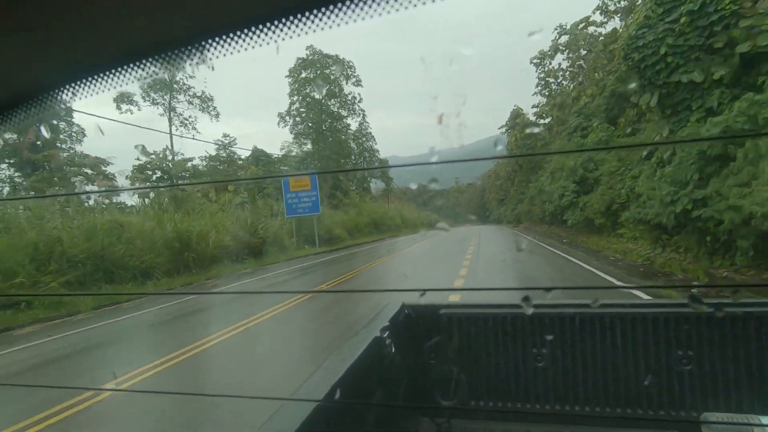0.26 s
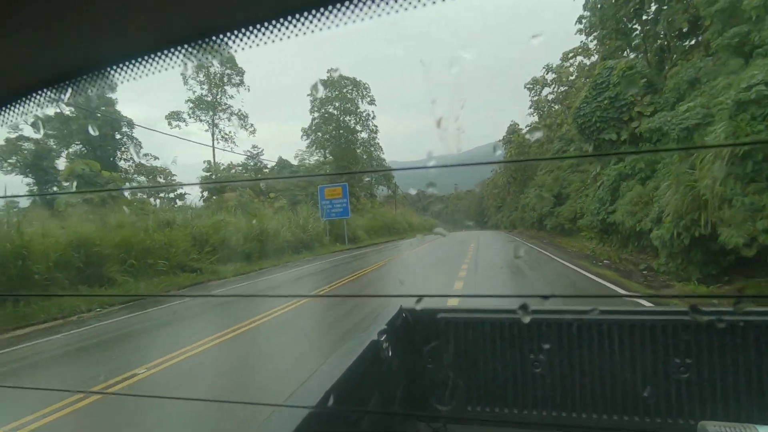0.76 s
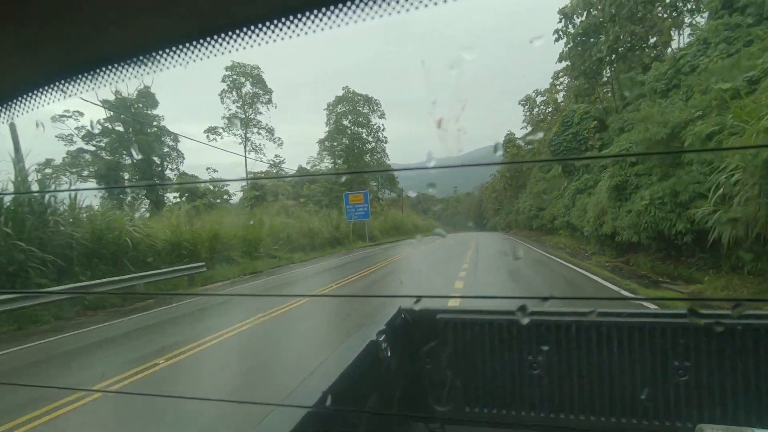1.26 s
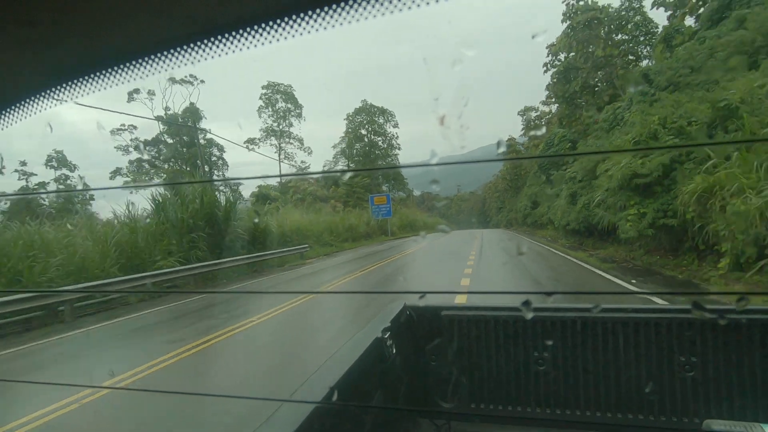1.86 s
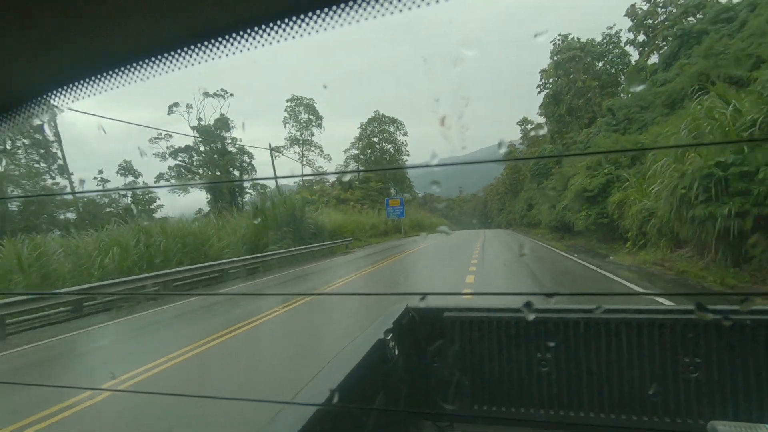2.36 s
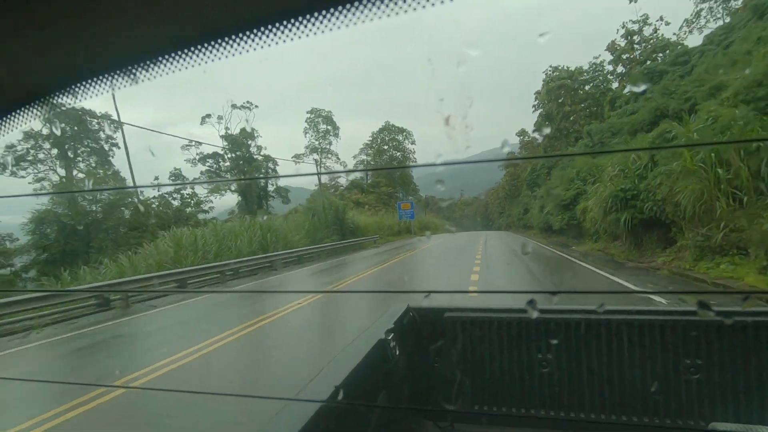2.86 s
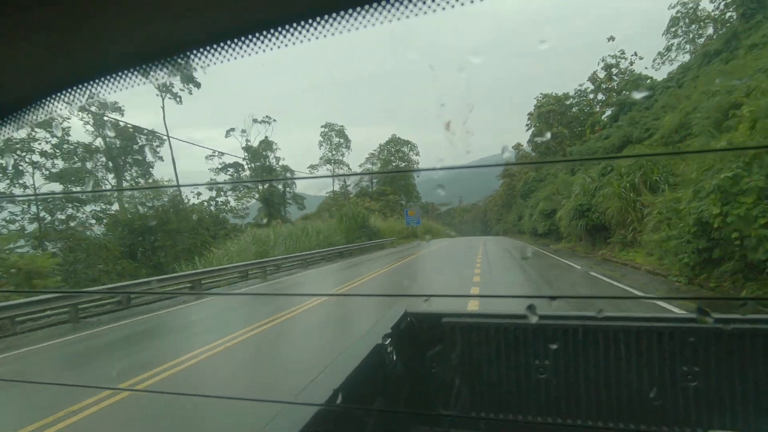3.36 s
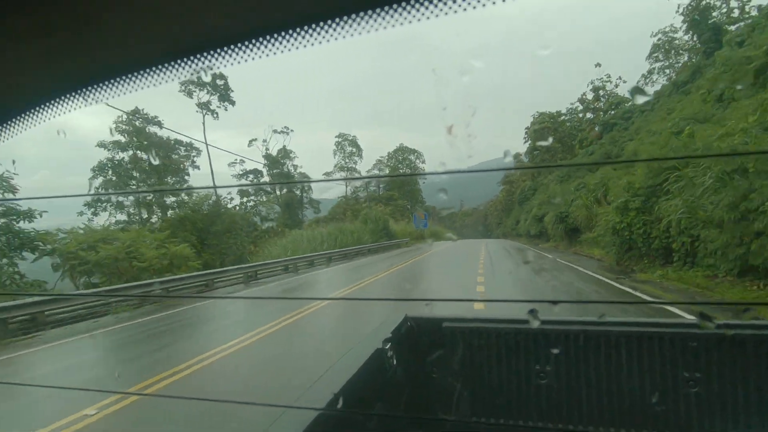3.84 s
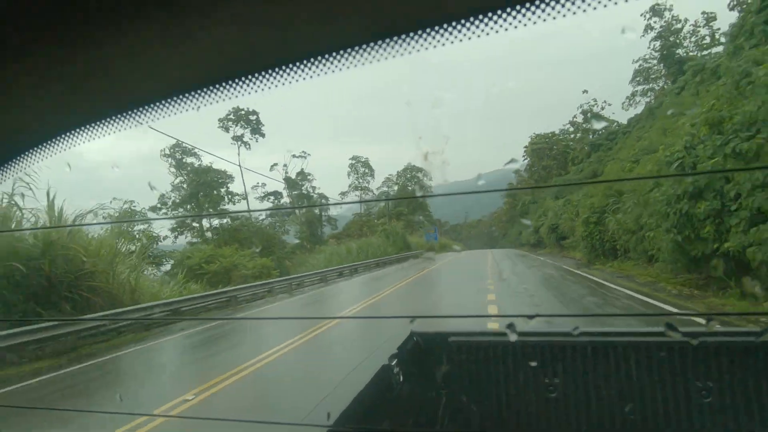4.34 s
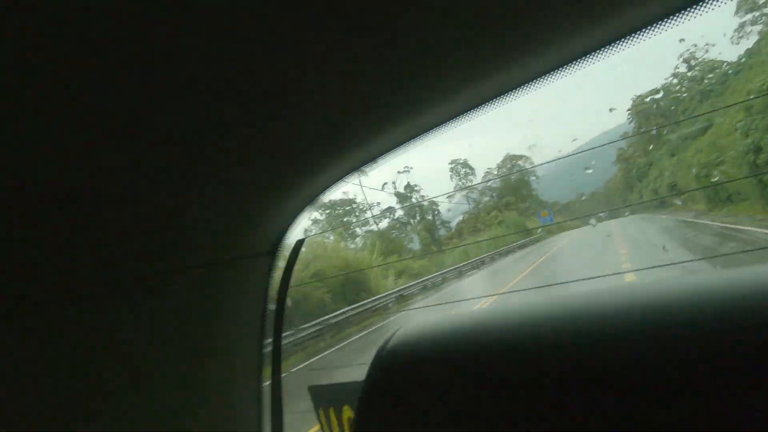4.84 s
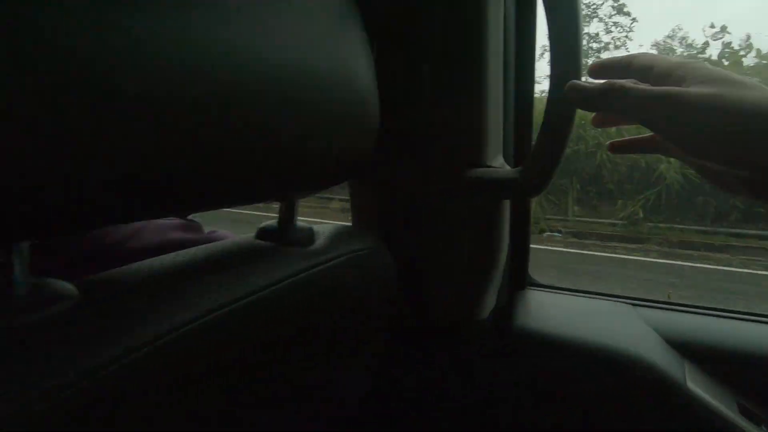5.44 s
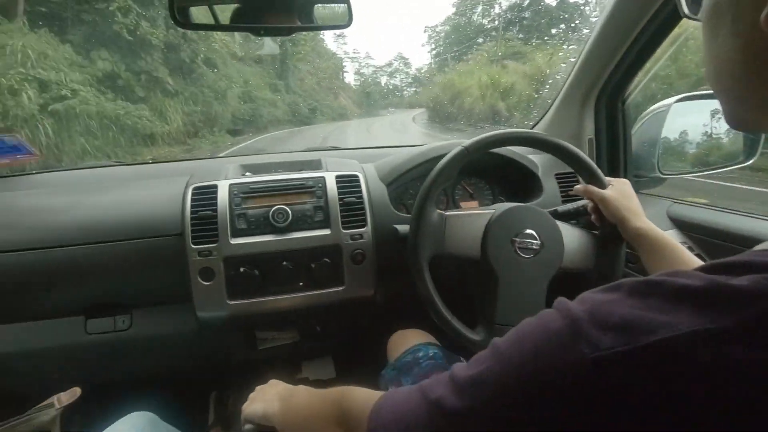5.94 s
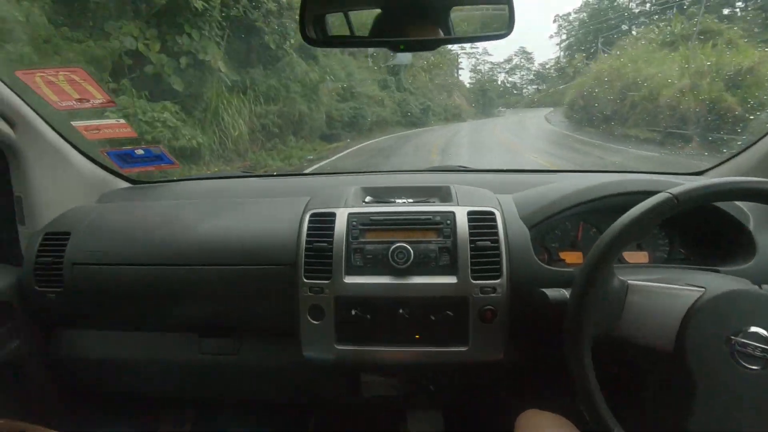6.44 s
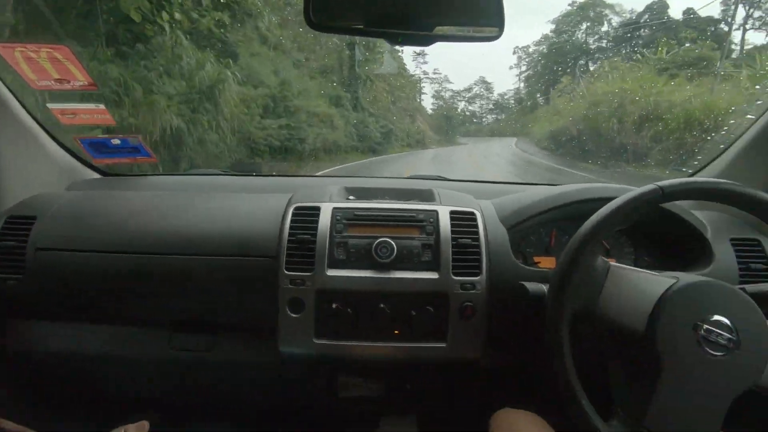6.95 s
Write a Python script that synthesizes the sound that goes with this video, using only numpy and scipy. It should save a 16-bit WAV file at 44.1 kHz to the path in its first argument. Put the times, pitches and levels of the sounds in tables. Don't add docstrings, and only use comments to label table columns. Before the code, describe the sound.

Steady low diesel drone and wet-road tyre roar inside a pickup cab, with body rumble, tiny ticks and a few dull handling knocks.

```python
import sys
import numpy as np
from scipy import signal
from scipy.io import wavfile
from scipy.ndimage import uniform_filter1d, minimum_filter1d

SR = 44100
rng = np.random.default_rng(int(sys.argv[2]) if len(sys.argv) > 2 else 0)


def volts(x):
    e = np.asarray(x, float) / 20
    return 10 ** e


def bounce(signal):
    frames = np.transpose(np.atleast_2d(signal))
    limited = np.clip(frames, -1, 1)
    pcm = np.round(limited * 32767).astype(np.int16)
    wavfile.write(sys.argv[1], SR, pcm)


N = 317520


def rms_one(x):
    return x / np.sqrt(np.mean(x ** 2) + 1e-20)


def in_time(rows):
    t, *columns = np.transpose(rows)
    return [np.interp(np.arange(N) / SR, t, column) for column in columns]


def at_hz(points, hz, axis=1):
    points = np.array(points)
    return np.interp(np.log(hz), np.log(points[:, 0]), points[:, axis])


def drift(rate_hz):
    thin = 40
    settle = 4000
    pole = np.exp(-2 * np.pi * rate_hz * thin / SR)
    white = rng.standard_normal(N // thin + settle + 2)
    slow = signal.lfilter([1], [1, -2 * pole, pole * pole], white)[settle:]
    return np.interp(np.arange(N) / thin, np.arange(len(slow)), rms_one(slow - slow.mean()))


def add(track, t, shape):
    i = round(t * SR)
    track[..., i:i + shape.shape[-1]] += shape[..., :N - i]


# f/Hz, lean to the right [0-1], left lead [share of mid], unrelated part level/dB re mid
PORTS = [(30, .28, 0.01, -9), (100, 0.16, 0.01, -12), (200, 0.12, 0.01, -23.5), (500, 0.39, .05, -10),
         (900, 0, .8, 2.5), (1500, 0, .7, -6), (2800, 0.08, .4, -1.5), (4800, .15, .05, -5.5),
         (8000, 0, 0.0091, 2)]


def through_ports(mid, stray, hz):
    quarter_ahead = np.gradient(mid) * SR / (2 * np.pi * hz)
    lean = at_hz(PORTS, hz)
    lead = at_hz(PORTS, hz, axis=2)
    unrelated = volts(at_hz(PORTS, hz, axis=3))
    side = -lean * mid + lead * quarter_ahead + unrelated * stray
    return np.array([mid, side])


# f/Hz, level/dB per Hz
SHUDDER = [(10, -12), (18, -3.5), (32, -2), (45, -9), (70, -25)]
RUMBLE = [(25, -21.5), (48, 0.5), (66, -0.5), (85, -9.5), (110, -23.5)]
PANELS = [(70, -7.5), (110, -3.5), (160, 1), (220, -4.5), (300, -13.5), (420, -33)]
ROAR = [(280, -9.5), (340, -2.5), (480, -12), (630, -13), (1070, -23.5), (1500, -26), (1900, -29.5),
        (2300, -39.5), (2800, -55)]
SIZZLE = [(1500, -10), (2200, -2.5), (2800, -3), (3600, -6.5), (4400, -14)]
SPRAY = [(3300, -17.5), (4300, -2.5), (5400, 1.5), (6500, -2.5), (7600, -6.5), (9000, -27.5), (10500, -35),
         (13000, -26.5), (16000, -31.5)]
MIST = [(6000, -11), (7600, 2), (8800, -12), (10000, -22.5), (12000, -34.5)]


def band_shares(edges, centres):
    shares = []
    for spectrum in [SHUDDER, RUMBLE, PANELS, ROAR, SIZZLE, SPRAY, MIST]:
        inside = (centres > spectrum[0][0]) & (centres < spectrum[-1][0])
        power = volts(at_hz(spectrum, centres)) ** 2 * np.diff(edges) * inside
        shares.append(power / power.sum())
    return np.array(shares)


# t/s, shudder level/dB, rumble level/dB
BODY = [(0.0, -57, -72), (0.06, -21, -40.5), (0.18, -48, -28), (0.3, -36.5, -18.5), (0.36, -33, -28.5),
        (0.5, -48, -18.5), (0.98, -38, -21), (1.26, -26.5, -25.5), (1.3, -34, -19), (1.44, -40, -23.5),
        (1.5, -10, -23), (1.62, -24.5, -22.5), (1.92, -35.5, -18.5), (2.04, -16, -27), (2.21, -56, -19.5),
        (2.28, -23, -19.5), (2.32, -38.5, -27.5), (2.36, -20, -24), (2.45, -25, -22), (2.49, -27.5, -15.5),
        (2.55, -31, -21), (2.89, -53.5, -19.5), (2.97, -23, -19), (3.01, -33.5, -18), (3.29, -31, -29.5),
        (3.33, -28.5, -37), (3.51, -37.5, -25), (3.55, -17.5, -35.5), (3.67, -57, -25.5), (3.71, -43, -28),
        (3.79, -33, -42), (3.85, -46, -22), (3.91, -34, -22.5), (3.97, -33, -22), (4.07, -31, -33.5),
        (4.13, -24, -24), (4.41, -29.5, -15.5), (4.49, -35, -22), (4.59, -22, -17.5), (4.69, -21, -27.5),
        (4.73, -12.5, -18.5), (4.79, -46, -19.5), (4.83, -33, -18), (4.89, -22, -21.5), (4.93, -15, -25),
        (4.97, -26.5, -23), (5.09, -23, -17.5), (5.13, -26, -23.5), (5.43, -32, -23), (5.55, -38.5, -22),
        (5.59, -20, -19.5), (5.69, -25.5, -24.5), (5.75, -22, -25), (5.79, -23.5, -29), (5.9, -23.5, -26),
        (6.0, -31, -35.5), (6.06, -20, -18), (6.17, -25, -33), (6.22, -30, -26.5), (6.54, -26.5, -24.5),
        (6.6, -28.5, -27), (6.64, -26.5, -25.5), (6.74, -33.5, -25.5), (6.94, -23.5, -24.5),
        (6.98, -29, -35.5), (7.04, -42, -28), (7.1, -48, -31), (7.2, -52.5, -29)]
# t/s, roar level/dB, tread sizzle level/dB, spray level/dB, fine mist level/dB
TYRES = [(0.0, -45.5, -77, -60.5, -57.5), (0.02, -45.5, -76, -70.5, -96), (0.4, -44.5, -76.5, -67.5, -88.5),
         (0.44, -46, -73, -71.5, -90.5), (0.46, -44, -76, -66.5, -84), (0.56, -46, -74, -71, -85.5),
         (0.92, -46.5, -71.5, -70.5, -90.5), (0.96, -48, -73, -66, -72.5), (1.04, -46, -71.5, -72.5, -83),
         (1.32, -45.5, -66.5, -69.5, -82), (1.52, -45.5, -67.5, -72, -76.5), (1.72, -47, -67, -69, -78.5),
         (1.76, -45.5, -66.5, -71.5, -77), (2.28, -47, -68, -72, -76.5), (2.69, -46, -67, -70.5, -79),
         (2.83, -44, -65.5, -71.5, -72), (2.87, -55.5, -72.5, -77.5, -81), (3.03, -49, -72.5, -73, -81),
         (3.15, -52.5, -80.5, -77.5, -98.5), (3.27, -55, -78, -73, -96.5), (3.41, -50, -75, -69.5, -84),
         (3.47, -55.5, -76, -72, -96.5), (3.51, -43.5, -79, -76, -81.5), (3.53, -58, -76, -72.5, -92),
         (3.59, -50, -77, -69, -84), (3.63, -51.5, -76, -70, -86.5), (3.73, -50.5, -75, -70, -93.5),
         (3.87, -50.5, -76, -71, -86.5), (3.99, -48, -74, -70.5, -93.5), (4.17, -46, -73.5, -69.5, -80.5),
         (4.53, -48, -74.5, -68, -88.5), (4.71, -48.5, -76, -70, -84.5), (4.85, -51, -76, -70, -84),
         (5.07, -49.5, -76, -68, -86), (5.11, -51.5, -79, -64, -67), (5.17, -49.5, -75, -70, -86.5),
         (5.35, -49.5, -74, -67, -73.5), (5.37, -49, -75.5, -68, -75.5), (5.59, -48, -71.5, -66.5, -72),
         (5.65, -48, -74, -65.5, -78), (5.88, -48.5, -70, -66, -64.5), (5.94, -47, -77, -64.5, -81),
         (6.0, -47.5, -70, -65.5, -82), (6.19, -47, -68, -64, -70), (6.22, -46.5, -71, -65, -76.5),
         (6.34, -48, -67, -67, -75), (6.38, -45, -65, -63, -76), (6.44, -45.5, -66.5, -66, -82),
         (6.58, -46.5, -64, -66, -74.5), (6.84, -44.5, -62.5, -65, -69.5), (7.04, -47, -65.5, -68.5, -80.5),
         (7.16, -47.5, -71, -68, -84), (7.18, -46, -64, -62, -73), (7.2, -48, -71, -65.5, -71.5)]


def road(own_db, shared_db, panel_db, evenness):
    _, _, boom_db, growl_db = in_time(ENGINE)
    panels_db = (boom_db + growl_db) / 2 + panel_db
    powers = volts(np.array(in_time(BODY) + [panels_db] + in_time(TYRES))) ** 2
    edges = 12.5 * 2 ** (np.arange(32) / 3)
    centres = np.sqrt(edges[1:] * edges[:-1])
    shares = band_shares(edges, centres)
    white = rng.standard_normal((2, 2, N + SR // 2))
    splash = drift(42)
    out = 0
    for k, hz in enumerate(centres):
        band = signal.butter(3, edges[k:k + 2], "band", fs=SR, output="sos")
        pair = signal.sosfilt(band, white[k % 2])[:, -N:]
        if hz < 100:
            local_power = uniform_filter1d(pair ** 2, size=int(2 * SR / hz)) + 1e-12
            pair = pair / local_power ** (evenness / 2)
        wetness = np.clip(np.log2(hz / 700) / 10.0, 0, 1)
        flicker = volts(own_db * drift(8) + shared_db * wetness * splash)
        gain = np.sqrt(shares[:, k] @ powers) * flicker / pair.std()
        out = out + through_ports(*(gain * pair), hz)
    return out


def jolt(height, decay_s):
    return height * np.exp(-np.arange(N) / SR / decay_s)


# t/s, peak level/dB, f/Hz
TICKS = [(0.304, -49.5, 4530), (0.4597, -44, 5160), (1.6872, -44.5, 3990), (1.717, -43.5, 3980),
         (2.0684, -51.5, 7280), (2.4536, -51.5, 3970), (2.7268, -49.5, 4240), (2.8934, -55, 4150),
         (2.9114, -51, 4070), (2.9622, -54, 4150), (3.3202, -58, 4412), (3.504, -46.5, 4470),
         (3.56, -61, 4302), (3.5858, -56.5, 4150), (3.685, -54.5, 4370), (3.7908, -55, 4950),
         (5.086, -53.5, 4000), (5.105, -45.5, 4050), (5.455, -56.5, 4380), (5.5683, -50.5, 6280),
         (5.6062, -43, 4350), (5.6484, -53.5, 4620), (5.6738, -51.5, 4850), (5.743, -48, 4210),
         (5.7918, -49.5, 5540), (6.2415, -44.5, 4700), (6.3126, -63.5, 5510), (6.364, -44, 5920),
         (6.4416, -49.5, 4760), (6.5576, -50, 4860), (6.5913, -51.5, 6150), (6.707, -41, 5640),
         (6.751, -49.5, 6340), (7.1803, -44, 6320)]


def ticks():
    out = np.zeros(N)
    t = np.arange(int(0.036 * SR)) / SR
    for start, peak_db, hz in TICKS:
        noise = rng.standard_normal(len(t)) * np.exp(-t / .002)
        band = signal.butter(3, [.5 * hz, min(1.59 * hz, 8800)], "band", fs=SR, output="sos")
        burst = signal.sosfilt(band, noise)
        add(out, start, volts(peak_db - 2.0) * burst / np.abs(burst).max())
    return through_ports(out, np.roll(out, 9), 6000)


# t/s, f/Hz, level/dB
SQUEAK = [(5.672, 13350, -105), (5.69, 13800, -87), (5.71, 13650, -84), (5.73, 13400, -80),
          (5.76, 13350, -82), (5.78, 13000, -87), (5.805, 12300, -100)]


def squeak():
    hz, level_db = in_time(SQUEAK)
    t = np.arange(N) / SR
    sounding = (t > SQUEAK[0][0]) * (t < SQUEAK[-1][0])
    return volts(level_db) * sounding * np.sin(2 * np.pi * np.cumsum(hz) / SR)


def click(cut_hz, floor_hz, edge_db):
    push = np.zeros(int(.06 * SR))
    push[0] = -1
    push = signal.sosfilt(signal.butter(2, floor_hz, "high", fs=SR, output="sos"), push)
    low = signal.sosfilt(signal.cheby1(6, 1.5, cut_hz, fs=SR, output="sos"), push)
    high = signal.sosfilt(signal.cheby1(6, 1.5, 1.62 * cut_hz, fs=SR, output="sos"), push)
    both = low + volts(edge_db) * high
    return both / np.abs(both).max()


def struck(hz, decay_s):
    t = np.arange(int(.06 * SR)) / SR
    return -t / decay_s * np.exp(1 - t / decay_s) * np.sin(2 * np.pi * hz * t)


# t/s, click level/dB, click cut-off f/Hz, thump level/dB, thump f/Hz, share alike in both ports
KNOCKS = [(1.457, -31, 1106, -23.5, 250, -0.43), (2.233, -26.5, 1100, -18, 220, -.2),
          (2.8535, -8, 1270, -15, 130, -0.38), (2.9124, -10, 1315, -10, 132, -0.34),
          (3.5044, -18.5, 1320, -26, 140, -0.3), (6.714, -28, 1320, -49, 150, -.2),
          (6.737, -28, 1328, -44, 150, -0.41), (6.811, -18, 1320, -19, 260, -0.29),
          (6.829, -35.5, 1330, -39, 200, -.3), (6.838, -32, 1334, -26, 180, -.3),
          (6.951, -21, 1100, -11.5, 200, -.45)]


def knocks():
    out = np.zeros((2, N))
    for t, click_db, cut_hz, thump_db, thump_hz, alike in KNOCKS:
        opposed = volts(click_db) * click(cut_hz, floor_hz=450, edge_db=-22)
        common = volts(click_db) * click(cut_hz, floor_hz=297, edge_db=-15)
        thump = volts(thump_db) * struck(thump_hz, 0.3 / thump_hz)
        add(out, t, opposed * [[0], [1]])
        add(out, t, common * [[alike], [0]])
        add(out, t + 0.0018, np.outer([-.8, 1], thump))
    return out


# t/s, crank turns f/Hz, throb level/dB, boom level/dB, growl level/dB (low, middle, upper orders)
ENGINE = [(0.0, 23.03, -21.5, -23.5, -24.5), (0.12, 22.87, -34.5, -25.5, -29.5),
          (0.74, 23.54, -25.5, -26.5, -28), (1.06, 23.64, -28, -27, -30), (1.52, 23.28, -30, -28, -16.5),
          (1.7, 23.14, -32, -29.5, -29.5), (1.8, 23.18, -36, -31.5, -28), (2.04, 23.1, -27, -27, -28),
          (2.55, 23.11, -32, -28.5, -29.5), (2.78, 23.1, -29, -28.5, -29.5), (2.93, 23.1, -25, -33.5, -33),
          (3.07, 22.72, -32.5, -30, -36), (3.21, 22.92, -34.5, -36, -36.5),
          (3.35, 23.15, -35.5, -30, -35.5), (3.67, 23.38, -38.5, -33.5, -40.5),
          (4.01, 23.11, -36, -28, -30), (4.29, 23.15, -29, -28, -29.5), (4.41, 23, -31, -30, -31.5),
          (4.55, 23.21, -19.5, -26.5, -30), (4.75, 23.27, -33.5, -28, -32.5),
          (5.01, 23.35, -29.5, -29, -38), (5.37, 23.3, -28, -32.5, -40.5), (5.63, 23.15, -29, -33, -36.5),
          (5.88, 23.19, -27.5, -34.5, -45.5), (6.04, 23.25, -28, -37.5, -35),
          (6.15, 23.23, -21.5, -32.5, -38.5), (6.4, 23.13, -34, -32, -34), (6.48, 22.98, -23, -30, -32),
          (6.9, 22.79, -24.5, -30, -39.5), (6.96, 22.61, -29, -31, -37), (7.04, 22.54, -25.5, -32, -37),
          (7.2, 22.9, -36.5, -35.5, -39.5)]
# multiple of crank turns, level/dB
CRANK_ORDERS = [(1, -10), (2, -3), (3, 0), (4, -2.5), (5, -6), (6, -7.5), (7, -3.5), (8, -6), (9, -10.5),
                (10, -11), (11, -10.5), (12, -13.5), (13, -25.5), (14, -18), (15, -24.5), (16, -25.5),
                (17, -32.5), (18, -27), (19, -34), (20, -30), (21, -34), (22, -26), (23, -37), (24, -32.5),
                (25, -34), (26, -40), (27, -43), (28, -42)]
# multiple of crank turns, level/dB
HIGH_LINES = [(7.5, -14.5), (9.5, -15), (13.5, -29.5), (40, -41.5), (45, -41.5)]
# t/s, order 22 level/dB, order 48 level/dB
WHINE = [(0, -58, -73), (1.5, -54, -71), (2.8, -54, -74), (3.2, -66, -73), (4.0, -63, -68.5),
         (4.9, -67, -69.5), (5.3, -57, -67), (5.8, -53.5, -66), (6.5, -61, -62), (6.8, -63, -68),
         (7.2, -59, -76)]


def engine(wander_db, offsets_db, stray_db):
    turns_hz, *groups_db = in_time(ENGINE)
    groups_db.append(in_time(TYRES)[0])
    angle = 2 * np.pi * np.cumsum(turns_hz * (1 + .002 * drift(2.92))) / SR
    orders = []
    for multiple, level_db in list(CRANK_ORDERS)[3:] + list(HIGH_LINES):
        group = int(multiple > 5) + int(multiple > 8) + int(multiple > 12)
        orders.append((multiple, level_db + groups_db[group] + offsets_db[group]))
    orders += list(zip([22, 48], in_time(WHINE)))
    out = 0
    for multiple, level_db in orders:
        gain = volts(level_db + wander_db * drift(5.4))
        phases = rng.uniform(0, 2 * np.pi, (2, 1))
        tone, stray = gain * np.sin(multiple * angle + phases)
        out = out + through_ports(tone, volts(stray_db) * stray, multiple * turns_hz.mean())
    return out


# t/s, side level/dB
WIDTH = [(0, -50), (.3, -67), (.45, -15.5), (.6, -8), (.9, -2.5), (1.3, -0.5), (2.9, 1.4), (3.2, -3),
         (3.5, -12.5), (4.0, -26), (4.3, -56), (5.9, -54), (6.0, -21.5), (6.2, -8), (6.5, -5.5),
         (6.9, -0.7), (7.2, -2.5)]


def scene():
    noise = road(own_db=1.6, shared_db=2.0, panel_db=-4, evenness=0.71)
    tones = engine(wander_db=2.5, offsets_db=[2.2, 2.2, 4.15, 20.5], stray_db=-5.5)
    mid, side = noise + tones + ticks()
    knock_mid, knock_side = knocks()
    mid = mid + knock_mid + squeak() + jolt(height=-0.13, decay_s=.003)
    side = side * volts(in_time(WIDTH)[0]) + knock_side
    return np.array([mid + side, mid - side])


def top_cut(x):
    return signal.sosfilt(signal.butter(12, 15720, fs=SR, output="sos"), x)


def record(dry):
    wanted = np.minimum(1, 0.64 / (np.abs(dry).max(axis=0) + 1e-9))
    gain = uniform_filter1d(minimum_filter1d(wanted, size=441), size=441)
    return top_cut(dry * gain)


dry = scene()
out = record(dry)
bounce(out)
```